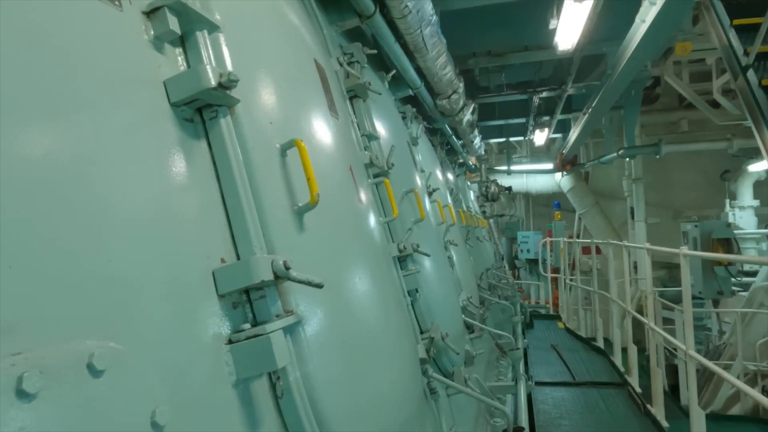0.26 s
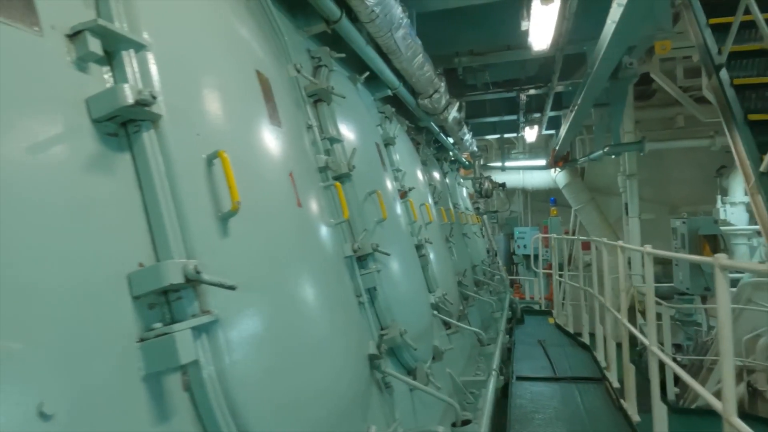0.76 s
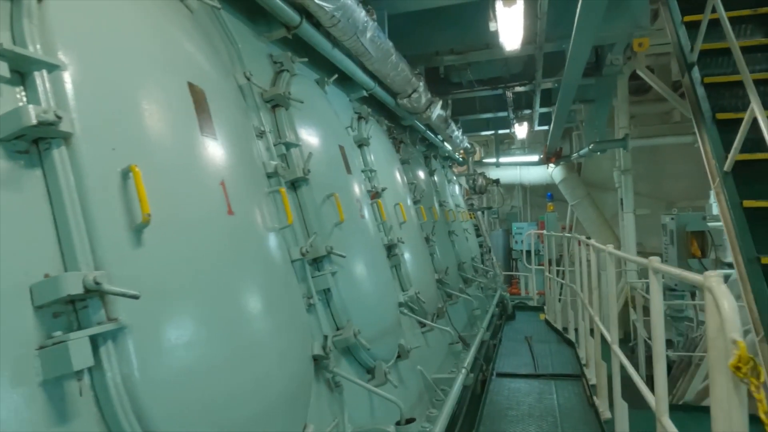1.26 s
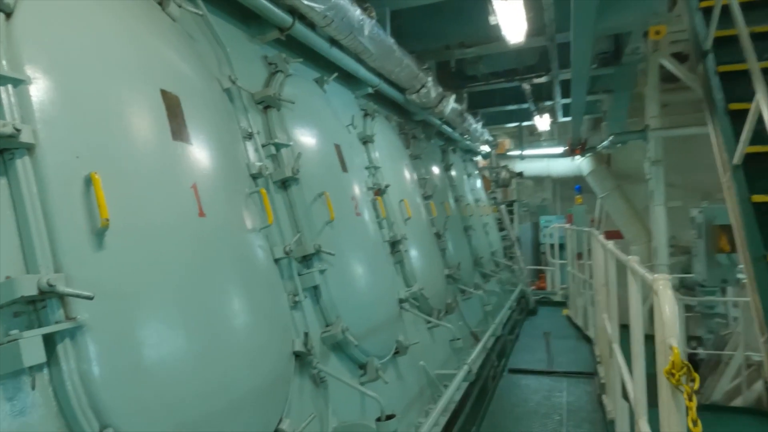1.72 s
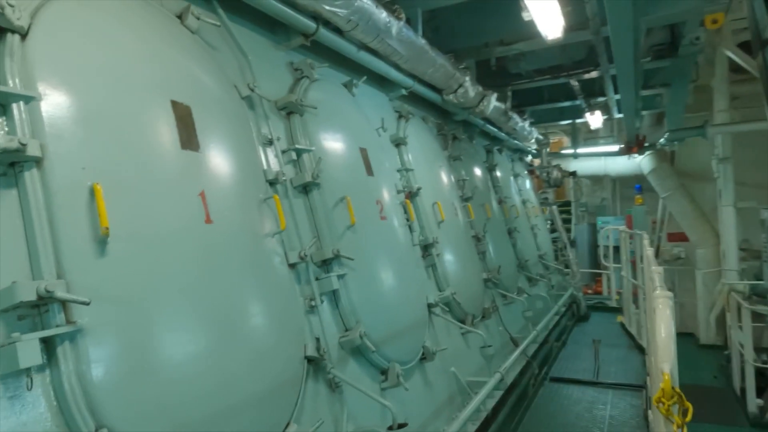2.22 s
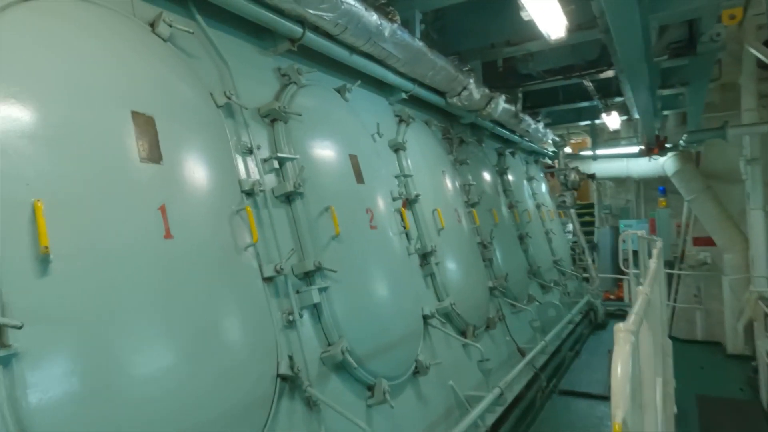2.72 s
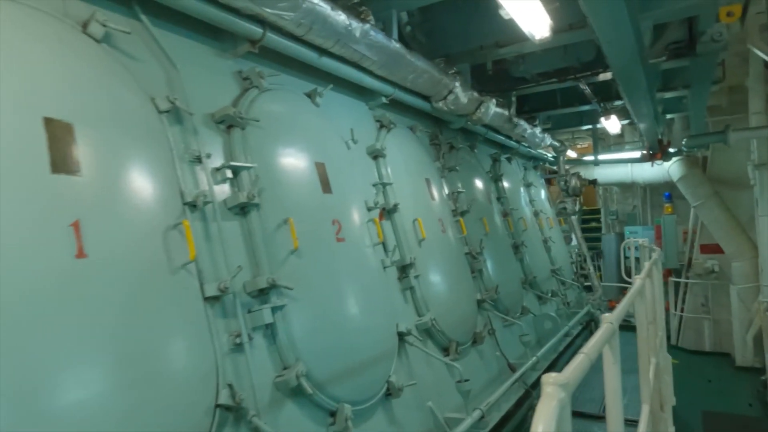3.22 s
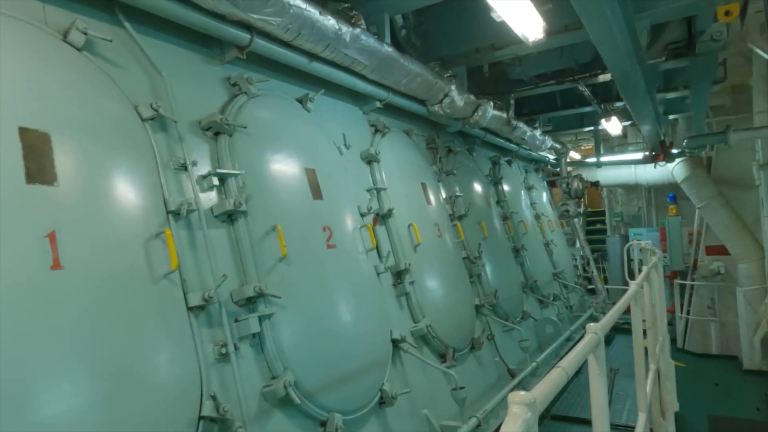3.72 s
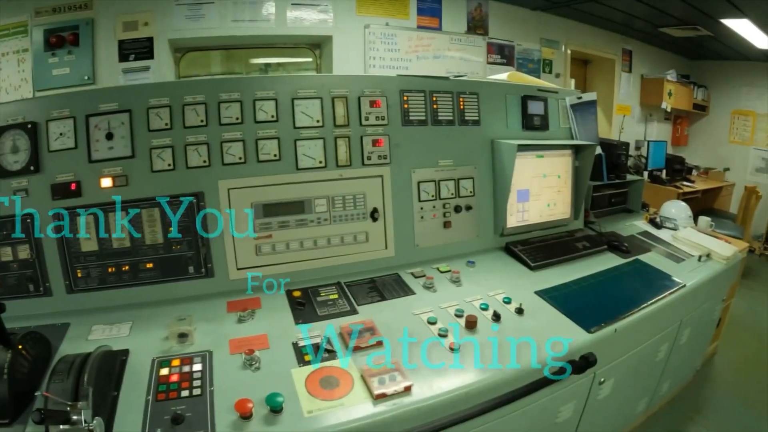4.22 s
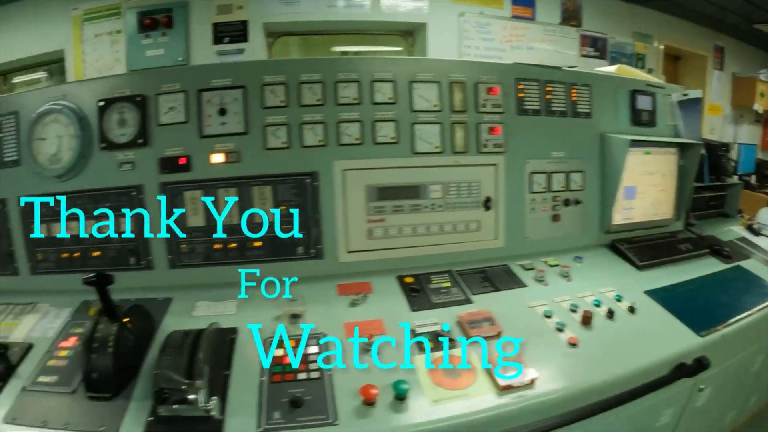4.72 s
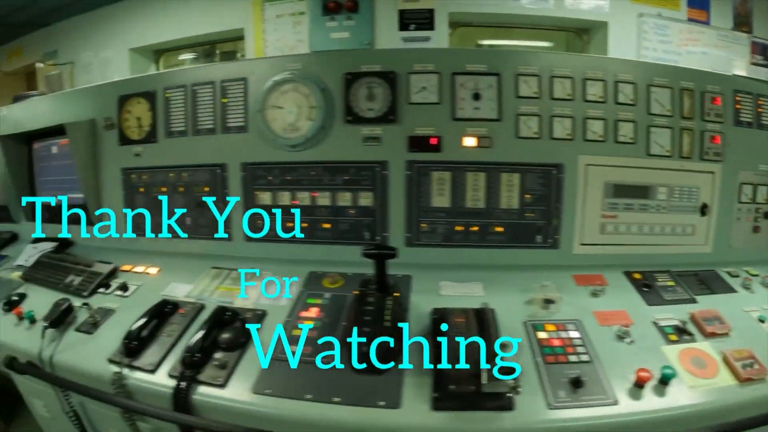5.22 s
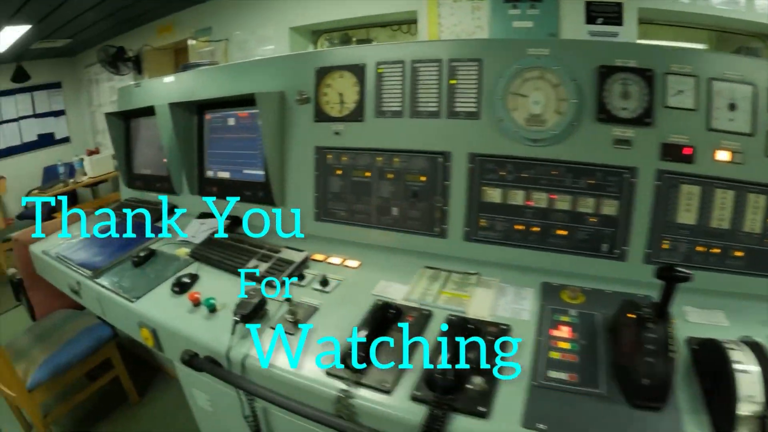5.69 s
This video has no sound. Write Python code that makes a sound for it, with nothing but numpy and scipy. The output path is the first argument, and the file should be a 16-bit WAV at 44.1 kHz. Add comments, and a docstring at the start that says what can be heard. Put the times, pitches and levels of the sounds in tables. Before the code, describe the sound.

Close stereo sound from someone walking through a ship's engine room. After a short silence, a dense, continuous roar and hiss bursts in with barely perceptible throbbing, pump tones and thin motor whines; the turbocharger whine grows gently in pulses. It stops suddenly, and after a blink of silence a darker hum through walls follows, with fan hiss and faint electrical cabinet whines.

```python
"""Ship's engine hall, on foot beside a big slow diesel: after a short silence its roar comes in abruptly,
with a faint throb at the firing rate, a turbocharger whine, ringing doors, motor whines and pump tones.
The roar and air are shaped noise; the tones waver with reflections and the hall's standing waves.
A short silent break, then the control room: deep hum through the walls, ventilation hiss, thin cabinet whines."""
import sys
import numpy as np
from scipy.fft import rfft, irfft, next_fast_len
from scipy.io import wavfile
from scipy.ndimage import map_coordinates

SR = 44100
rng = np.random.default_rng(int(sys.argv[2]) if len(sys.argv) > 2 else 0)


def file_out(sig):
    """Save sig as 16-bit WAV at sys.argv[1]."""
    # one column per channel
    cols = np.atleast_2d(sig).T
    # limit, then scale
    lim = np.clip(cols, -1, 1)
    pcm = np.round(lim * 32767).astype(np.int16)
    wavfile.write(sys.argv[1], SR, pcm)


N = 262395

# the stay in the engine hall: start t/s, end t/s
HALL_TIMES = (.3875, 4.898)


def amp(db):
    """Decibels to gain."""
    return 10 ** (np.asarray(db) / 20)


def unit(x):
    """Scale to rms 1."""
    return x / np.sqrt(np.mean(x ** 2) + 1e-20)


def along(points, hz):
    """Read (f/Hz, value) points on a log frequency axis."""
    f, value = np.transpose(points)
    return np.interp(np.log(hz + 1), np.log(f + 1), value)


def bump(centre, half):
    """A bell in time, 1 at its centre and 1/e at half seconds to either side."""
    return np.exp(-((np.arange(N) / SR - centre) / half) ** 2)


def wobble(rate):
    """A smooth random curve through rate knots a second."""
    coarse = np.linspace(0, N, N // 64)
    knots = rng.standard_normal(1024)
    curve = map_coordinates(knots, [coarse * rate / SR], mode="wrap")
    return np.interp(np.arange(N), coarse, curve)


def filtered(x, response):
    """Shape the spectrum of x by a response of frequency."""
    size = next_fast_len(N + SR // 2)  # room for the filter's tail
    spectrum = rfft(x, size) * response(np.fft.rfftfreq(size, 1 / SR))
    return irfft(spectrum, size)[..., :N]


def rush(spectrum, ripple_db=0, ripple_hz=20):
    """Two unrelated noises, together of rms 1; crowded room modes ripple their spectrum."""
    knots = rng.standard_normal(8192)

    def response(hz):
        ripple = ripple_db * np.interp(hz / ripple_hz, np.arange(len(knots)), knots)
        inside = (hz > spectrum[0][0]) & (hz < spectrum[-1][0])
        return inside * amp(along(spectrum, hz) + ripple)

    return unit(filtered(rng.standard_normal((2, N)), response))


def tone(hz, diffuse, rate):
    """A mid and side pair of rms 1: a steady part plus reflections of drifting strength and phase."""
    start = rng.random((2, 1))  # in turns
    phase = 2 * np.pi * (np.cumsum(hz * np.ones(N)) / SR + start)
    field = np.array([1 + diffuse * (wobble(rate) + 1j * wobble(rate)) for _ in range(2)])
    return unit(np.real(field * np.exp(1j * phase)))


def control_room(walls_db=-29.5, vent_db=-41, hum_lift_db=1.0):
    """The walls pass only the engine's bass; fans and electrical cabinets add hiss and fixed tones."""
    # engine bass through the walls: f/Hz, relative level/dB per Hz
    wall_spectrum = [(16, -26), (25, -4), (36, 11), (52, -6), (72, -2), (100, 1.5), (120, -4.5), (150, -5),
                     (200, -18), (230, -13.5), (300, -14.5), (380, -15), (480, -19.5), (650, -68)]
    # ventilation hiss: f/Hz, relative level/dB per Hz
    vent_spectrum = [(300, 0.5), (480, -0.5), (600, 0.5), (680, -4), (770, 0.5), (850, -7), (970, -2),
                     (1150, -7.5), (1450, -5), (1900, -11.5), (3200, -17), (7500, -26), (11000, -31),
                     (12200, -38), (15700, -46)]
    # machinery hum and cabinet whines at the desk: f/Hz, level/dB before the lift
    hum_tones = [(37.5, -53), (66.5, -38), (86.1, -36), (134.6, -34), (148.5, -40), (177.6, -40.5),
                 (204.6, -46.5), (213, -53), (269.2, -48.5), (347, -70), (378, -50.5), (403.7, -52.5),
                 (498, -64), (592.2, -52), (753.7, -63), (920.5, -57), (974.4, -56), (1238, -60.5),
                 (1308, -61), (1394, -58.5), (1642, -63), (2148, -64), (5459, -76), (6455, -75),
                 (9522, -82), (9868, -75), (10820, -86)]
    drone = amp(walls_db) * rush(wall_spectrum, ripple_db=3.5, ripple_hz=3)
    fans = amp(vent_db) * rush(vent_spectrum, ripple_db=2.5, ripple_hz=10)
    hum = sum(amp(db + hum_lift_db) * tone(hz, diffuse=.2, rate=4) for hz, db in hum_tones)
    return drone + fans + hum


def pumps():
    """Steady auxiliary machines in the hall, heard through shifting reflections."""
    # pumps and generators: f/Hz, level/dB
    pump_tones = [(36.7, -57.5), (47, -47), (81, -45.5), (197, -46.5), (351, -57.5), (411, -70),
                  (1291, -65.5)]
    return sum(amp(db) * tone(hz, diffuse=0.44, rate=6) for hz, db in pump_tones)


def motors():
    """Each thin motor whine swells as 1 / distance while the microphone walks past."""
    # motors beside the walkway: f/Hz, level/dB when nearest, t/s when nearest,
    # time/s to walk one passing distance
    motor_passes = [(4312, -74.5, 2.4, 1.1), (4603, -71, 4.6, 2.2), (5858, -77, 4.1, 1.3)]
    t = np.arange(N) / SR
    whines = 0
    for hz, db, nearest, passing in motor_passes:
        distance = np.hypot(1, (t - nearest) / passing)  # in passing distances
        whines = whines + amp(db) / distance * tone(hz, diffuse=0.38, rate=8.2)
    return whines


def doors():
    """Steel crankcase doors, shaken by the engine, ring in a narrow band; each is heard in passing."""
    # door ringing: f/Hz, relative level/dB per Hz
    door_spectrum = [(940, -37), (1010, 17), (1070, -5), (1120, 10), (1155, 18), (1210, -24)]
    # doors passed at close range: t/s when nearest, level/dB when nearest, half length/s
    door_passes = [(.78, -48, 0.23), (1.43, -47, .17)]
    nearness = sum(amp(db) * bump(s, half) for s, db, half in door_passes)
    return nearness * rush(door_spectrum)


def turbocharger(fade_db=2.5, partial_fade_db=1.5, skirt_db=-4):
    """A blade tone swells at its standing wave's crests; turbulent intake air blurs fluttering overtones."""
    # blade pitch along the walk: t/s, f/Hz
    blade_pitch = [(.4, 1683), (2, 1677), (3, 1673.5), (4.9, 1674)]
    # partials, blade tone first: mean level/dB at mid walk, growth/dB per s as the microphone nears
    partial_levels = [(-57.5, 1.5), (-68, 0.7), (-73.5, .9), (-77, 1), (-89.5, 1), (-85.5, 0.5), (-98, 0)]
    mid_walk_s = 2.65
    crest_gap_s, crest_s, reflected = .527, 2.45, .33  # crest spacing, one crest, reflected share (0-1)
    t = np.arange(N) / SR
    pitch = np.interp(t, *np.transpose(blade_pitch))
    blade, *overtones = [db + growth * (t - mid_walk_s) for db, growth in partial_levels]
    standing = np.abs(1 + reflected * np.exp(2j * np.pi * (t - crest_s) / crest_gap_s))
    whine = amp(blade + fade_db * wobble(8)) * standing * tone(pitch, diffuse=.1, rate=8)
    for multiple, level in enumerate(overtones, 2):
        partial = tone(multiple * pitch, diffuse=.5, rate=16)
        skirt = tone(multiple * pitch, diffuse=7.3, rate=20 * multiple)  # fast drift makes it fuzzy
        whine += amp(level + partial_fade_db * wobble(9)) * (partial + amp(skirt_db) * skirt)
    return whine


def diesel(throb_db=0.05, flutter_db=0.8, heave_db=0.35, thump_db=-47):
    """Rumble, roar and rushing air; firing slightly swells roar and air and pushes on the hall's air."""
    # three noise spectra: f/Hz, relative level/dB per Hz
    rumble_spectrum = [(12, -28), (21, -6.5), (38, -2.5), (60, -1.5), (84, -6.5), (100, -3.5), (150, -4),
                       (195, -3), (245, -5.5), (275, -10), (300, -7.5), (370, -10.5), (500, -16),
                       (680, -41)]
    roar_spectrum = [(260, -21), (450, -1), (565, -0.5), (664, -2.5), (715, -3), (1110, -0.5), (1230, -5),
                     (1580, -8), (1630, -9), (1720, -5.5), (1760, -10), (1910, -11), (2600, -16),
                     (3380, -65), (5720, -120)]
    air_spectrum = [(2000, -34), (2500, -0.5), (3200, -1.5), (3800, -6), (5000, -9.5), (6000, -13),
                    (7200, -15.5), (8100, -23), (10200, -25.5), (11000, -30.5), (12200, -30.5),
                    (12800, -38), (14000, -33.5), (15700, -55)]
    # brief dips and swells of the din: t/s, half length/s, roar change/dB, air hiss change/dB
    flickers = [(0.55, 0.02, -3.5, 1), (1.27, 0.016, 2, 2), (1.342, 0.014, -4.5, -9.5),
                (4.29, 0.019, -1, -2)]
    firing_hz = 7.33
    rumble_db, roar_db, air_db = -36, -41.5, -54.5  # mean levels, the air's once near the intake
    air_start_db, air_reached_s = -1.4, 2.1  # the hiss grows over the first steps towards the intake
    t = np.arange(N) / SR
    firing = 2 * np.pi * firing_hz * t
    swell = throb_db * np.cos(firing) + flutter_db * wobble(35)
    roar_flicker, air_flicker = sum(np.outer(depths, bump(s, half)) for s, half, *depths in flickers)
    approach = np.interp(t, [HALL_TIMES[0], air_reached_s], [air_start_db, 0])
    rumble_level = amp(rumble_db + heave_db * wobble(5.58))
    rumble = rumble_level * rush(rumble_spectrum, ripple_db=0.4, ripple_hz=9)
    roar_level = amp(roar_db + roar_flicker + swell)
    roar = roar_level * rush(roar_spectrum, ripple_db=2.4, ripple_hz=14)
    air_level = amp(air_db + approach + air_flicker + swell)
    hiss = air_level * rush(air_spectrum, ripple_db=-0.7, ripple_hz=30.77)
    thump = amp(thump_db) * (np.sin(firing) + .5 * np.sin(2 * firing))
    return rumble + roar + hiss + thump


def microphones(pair, width, lean):
    """Two close capsules hear the same bass and partly unrelated treble."""
    mid = pair[0]
    side = filtered(pair[1], lambda hz: amp(along(width, hz)))

    def balance(hz):
        shading = along(lean, hz) * np.clip(hz / 200 - 1, 0, 1)  # no lean below 200 Hz, full from 400 Hz
        return amp(np.outer([.5, -.5], shading))

    return filtered(np.array([mid + side, mid - side]), balance)


def scene():
    """The hall starts and stops abruptly; after a silent break the control room fades in quickly."""
    # stereo width in the hall and at the desk: f/Hz, side minus mid level/dB
    hall_width = [(60, -57), (110, -66), (200, -31.5), (380, -19), (700, -12), (1290, -10), (2380, -6.5),
                  (4400, -7), (8120, -5.5), (15000, 0)]
    desk_width = [(110, -68), (200, -54), (380, -24), (700, -15), (1290, -10.5), (2380, -7), (8120, -7.5),
                  (15000, -1)]
    # left-right balance in the hall and at the desk: f/Hz, left minus right level/dB (full from 400 Hz)
    hall_balance = [(200, 0.5), (600, 0.8), (1100, 2.5), (2200, 1.3), (4000, 1), (5600, 0.5), (7300, 3.5),
                    (10200, 3.5), (11000, 2), (12000, 6.5), (15000, 8)]
    desk_balance = [(60, 0.5), (110, 0.0), (200, -3), (380, 0.5), (700, 2.5), (1290, 3.0), (2380, 2.5),
                    (4400, 1.5), (8120, 0.5), (15000, 5)]
    desk_start_s = 4.958
    t = np.arange(N) / SR
    machines = pumps() + motors() + doors() + turbocharger() + diesel()
    hall = microphones(machines, hall_width, hall_balance)
    desk = microphones(control_room(), desk_width, desk_balance)
    in_hall = np.clip(np.minimum(t - HALL_TIMES[0], HALL_TIMES[1] - t) / .002, 0, 1)
    at_desk = np.clip((t - desk_start_s) / .022, 0, 1)
    return hall * in_hall + desk * at_desk


def record(dry):
    """The recorder's band limit: a 60 Hz wide slope to silence, centred on its top frequency."""
    top_hz = 15720
    return filtered(dry, lambda hz: np.clip((top_hz - hz) / 60 + .5, 0, 1))


dry = scene()
out = record(dry)
file_out(out)
```